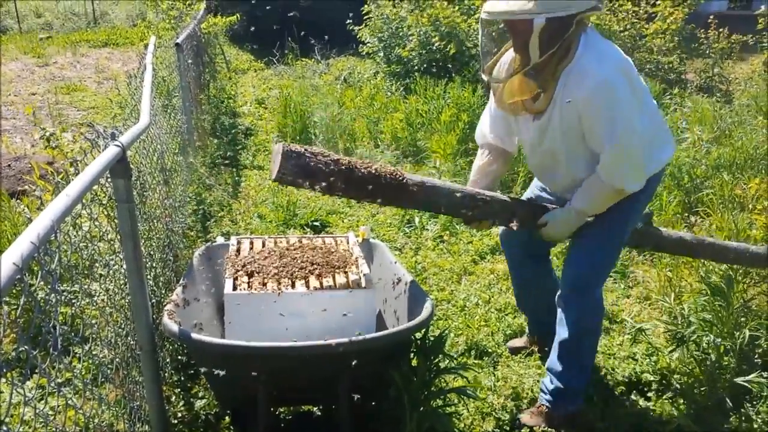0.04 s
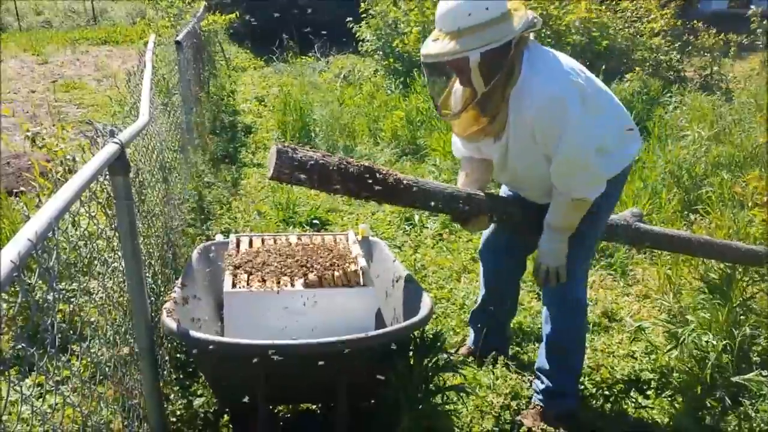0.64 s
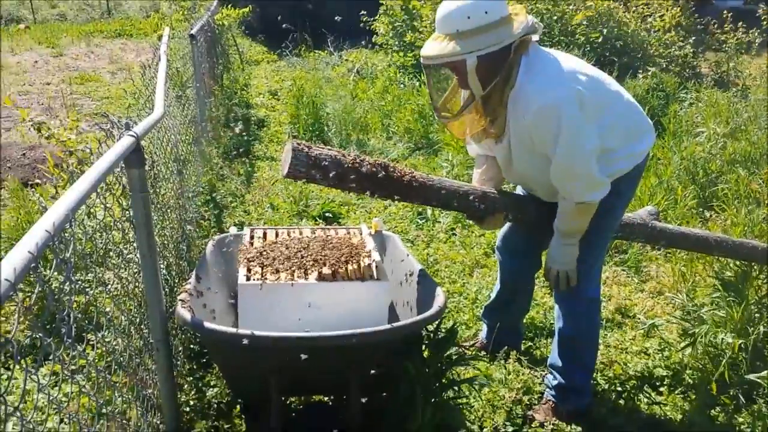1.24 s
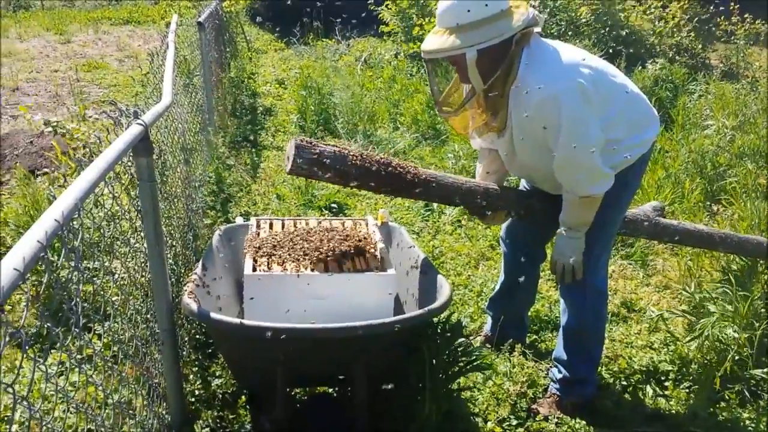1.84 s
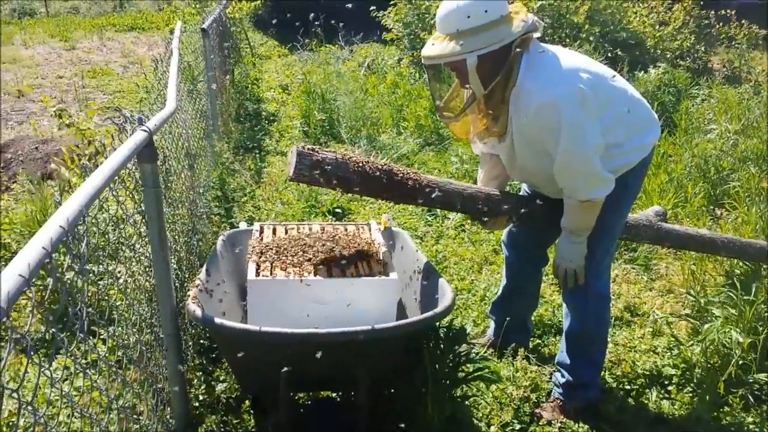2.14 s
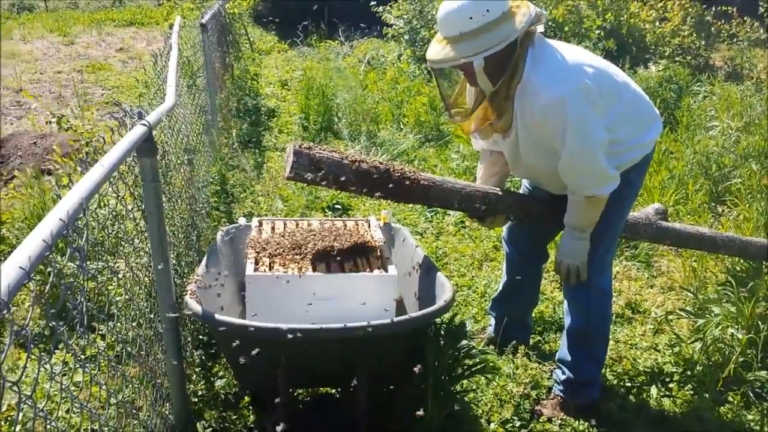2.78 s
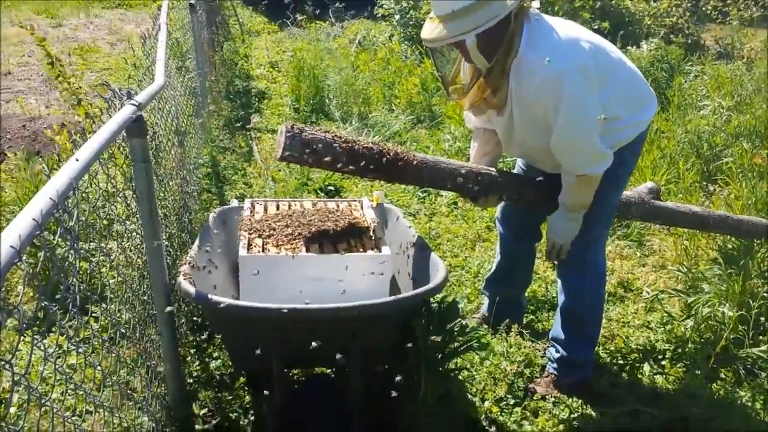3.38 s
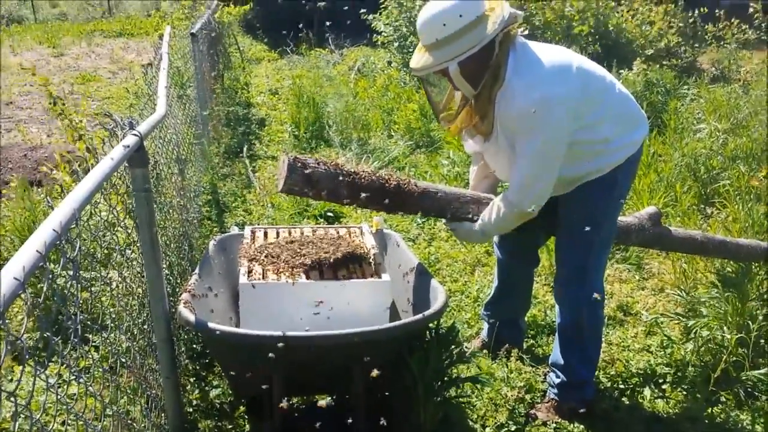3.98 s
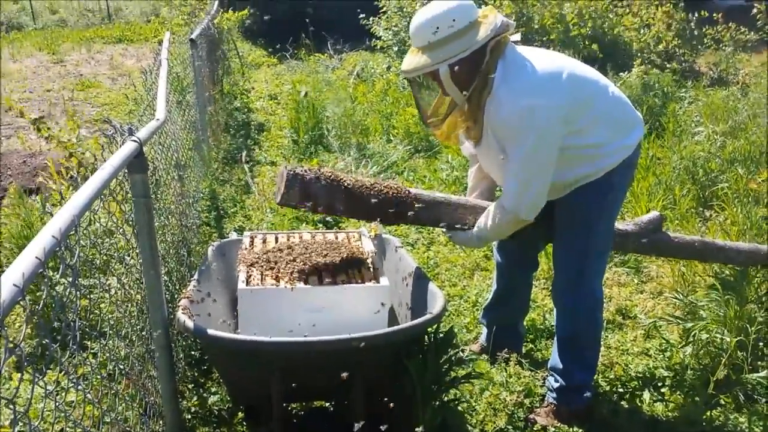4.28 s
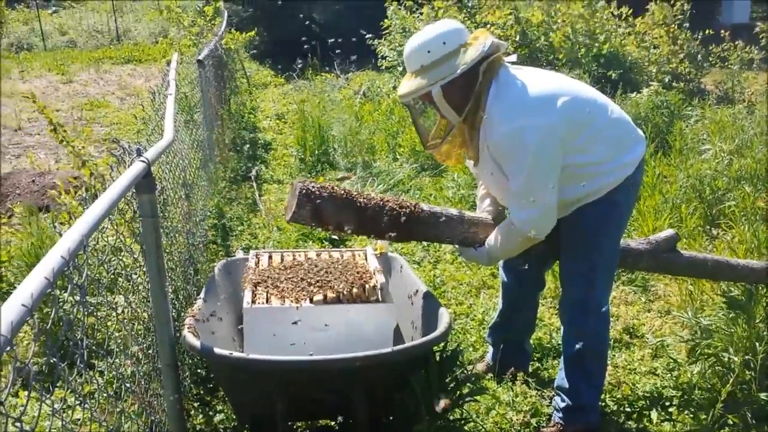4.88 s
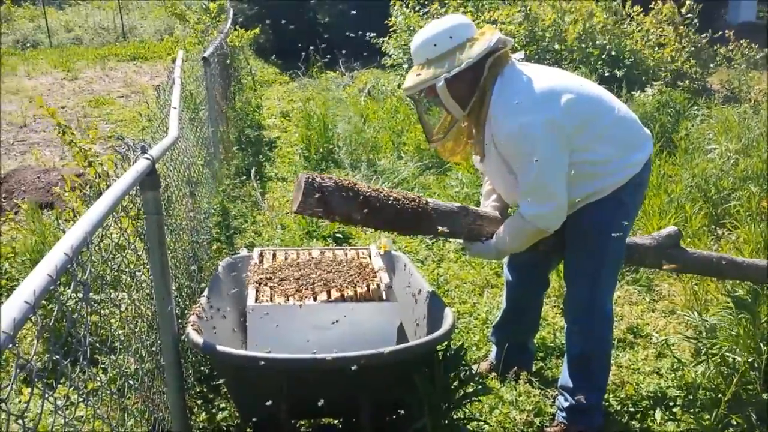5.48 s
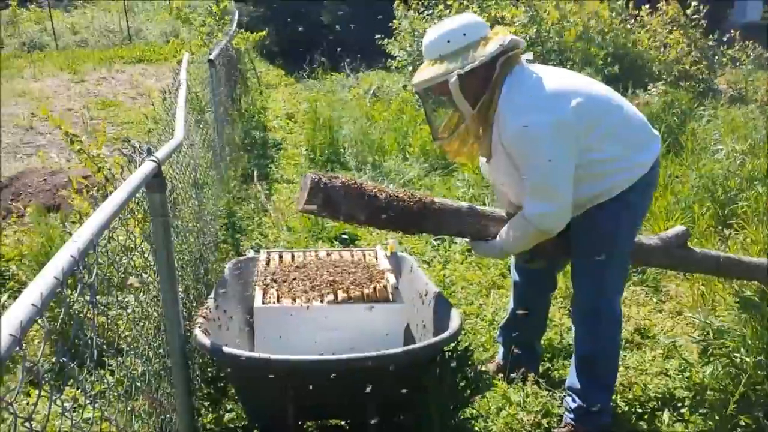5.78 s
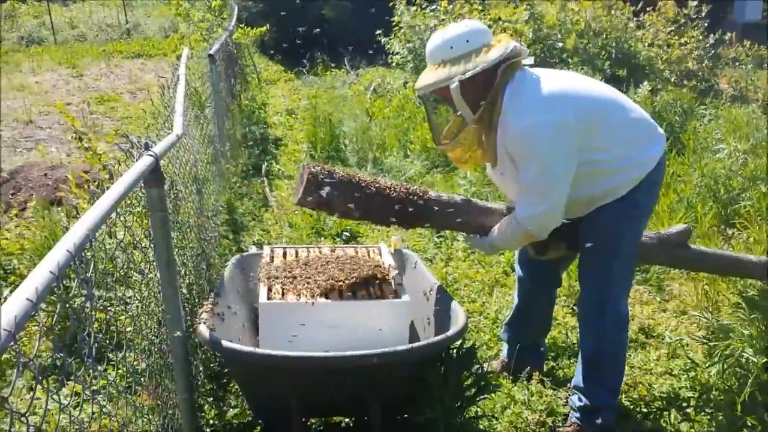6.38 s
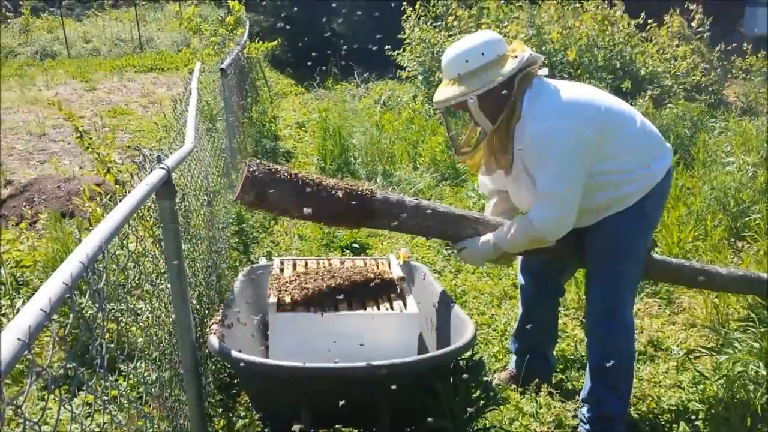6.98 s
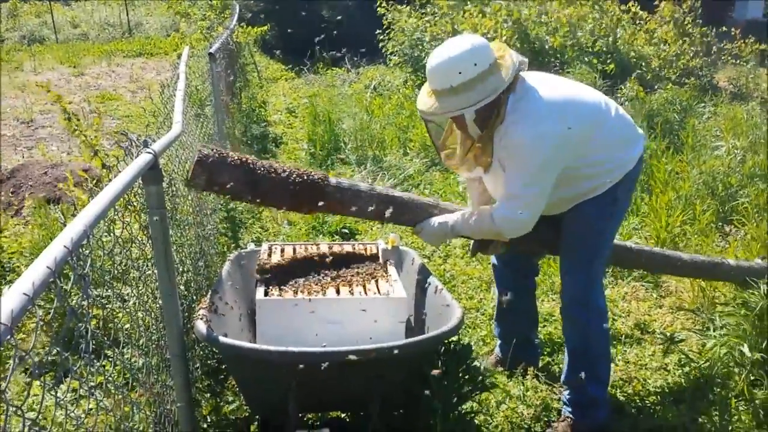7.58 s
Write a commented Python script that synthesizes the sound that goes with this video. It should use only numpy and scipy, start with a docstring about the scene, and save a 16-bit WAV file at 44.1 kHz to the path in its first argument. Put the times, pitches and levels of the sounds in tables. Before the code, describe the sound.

Gusty wind rumbles and thumps right on the microphone, shifting between right and left and peaking a little past halfway. Underneath, many bees buzz in a wavering drone, with lightly hissing foliage and a faint distant rumble outdoors. A songbird whistles once at the opening, along with a tiny close tick, then returns near the end with six quick falling phrases.

```python
"""Bees in a gusty yard

A swarm beats its wings round a log and a hive box, over hissing grass and leaves and a far rumble.
Wind eddies buffet both ports of the camera microphone; the strongest gust pushes its limiter down.
A songbird repeats a three-part falling whistle, echoed by a wall; one sharp tick sounds close by."""
import sys
import numpy as np
from scipy import signal
from scipy.fft import rfft, irfft, next_fast_len
from scipy.io import wavfile
from scipy.ndimage import uniform_filter1d, map_coordinates

SR = 44100
rng = np.random.default_rng(int(sys.argv[2]) if len(sys.argv) > 2 else 0)


def waveform_to_disk(signal):
    """Save audio, clipped to [-1, 1], as 16-bit WAV at the path in sys.argv[1]."""
    frames = np.transpose(np.atleast_2d(signal))
    scaled = np.clip(frames, -1, 1) * 32767
    samples = np.round(scaled).astype(np.int16)
    wavfile.write(sys.argv[1], SR, samples)


N = 341334


def amp(db):
    """Decibels to gain."""
    return 10 ** (np.asarray(db) / 20)


def unit(x):
    """x scaled to rms 1."""
    return x / np.sqrt(np.mean(x ** 2) + 1e-20)


def gain_at(points, hz):
    """Gain at hz from (f/Hz, level/dB) points joined on a log axis."""
    f, db = np.transpose(points)
    return amp(np.interp(np.log(hz + 1), np.log(f), db))


def curve(rows):
    """(t/s, value) rows as one value per sample."""
    return np.interp(np.arange(N) / SR, *np.transpose(rows))


def wobble(rate):
    """A smooth random curve with rate knots a second."""
    coarse = np.linspace(0, N, 2048)
    knots = rng.standard_normal(1024)
    smooth = map_coordinates(knots, [coarse * rate / SR], mode="wrap")
    return np.interp(np.arange(N), coarse, smooth)


def filtered(x, response):
    """x through a filter whose gain is response(hz)."""
    n = x.shape[-1]
    padded = next_fast_len(n + SR // 4)
    return irfft(rfft(x, padded) * response(np.fft.rfftfreq(padded, 1 / SR)), padded)[..., :n]


def noise(spectrum, size):
    """Coloured noise of rms 1."""
    return unit(filtered(rng.standard_normal(size), lambda hz: gain_at(spectrum, hz)))


def running_rms(x, seconds):
    """Level of x under a soft sliding window."""
    width = max(int(seconds * SR), 1)
    return np.sqrt(np.abs(uniform_filter1d(uniform_filter1d(x ** 2, width), width)) + 1e-12)


def swarm(count=24, wing_hz=247, spread=.06, roam_db=3.5, width=0.47):
    """Each bee beats its wings at its own wavering rate and drifts nearer, farther and sideways."""
    # the hum as it reaches the microphone: t/s, level/dB
    hum_levels = [(0, -45.5), (1, -44), (3, -41), (5, -42.5), (6.5, -40), (7.74, -45)]
    # envelope of the wingbeat harmonics: f/Hz, relative level/dB
    wing_spectrum = [(240, 4.5), (480, -1.5), (750, -6), (1000, -5.5), (1300, -19.5), (2000, -13.5),
                     (3000, -29.5), (5000, -70)]
    cycle = np.arange(2048) / 2048
    orders = np.arange(1, 21)[:, None]
    strengths = gain_at(wing_spectrum, orders * wing_hz)
    hum = np.zeros((2, N))
    for rank in np.linspace(-1, 1, count):
        phases = 2 * np.pi * (orders * cycle + rng.random(orders.shape))
        stroke = np.sum(strengths * np.sin(phases), axis=0)
        waver = .028 * wobble(4) + .005 * wobble(30)
        # most bees fly near the top rate; a few beat slower
        pitch = wing_hz * (1 + spread * rank - .15 * min(rank, 0) ** 2) * (1 + waver)
        stroke_index = (np.cumsum(pitch) / SR * len(cycle)).astype(int) % len(cycle)
        bee = stroke[stroke_index] * amp(roam_db * wobble(4))
        side = width * wobble(0.73)
        hum += bee * np.array([1 + side, 1 - side])
    return amp(curve(hum_levels)) * unit(hum)


def rustle(level_db=-2.0, flutter_db=0.65, alike_hz=1200):
    """Grass and leaves hiss all round the microphone and swish as the log is handled."""
    # course of the hiss: t/s, relative level/dB
    hiss_levels = [(0, -33.5), (.65, -38), (4.4, -36), (5.1, -37), (7.74, -35)]
    # noise spectrum of the foliage: f/Hz, relative level/dB
    leaf_spectrum = [(200, 13), (600, -0.5), (1100, 7), (1700, -1.5), (3000, -2.5), (5000, 1.5),
                     (9000, -4.5), (14000, 1)]
    # swishes at the log: centre t/s, level/dB, half length/s
    swishes = [(.46, -46, 0.061), (5.367, -47, .048), (6, -38, .015), (6.325, -40, 0.065),
               (6.953, -42.5, 0.15), (7.547, -39.5, 0.055)]
    own, shared = noise(leaf_spectrum, size=(2, N)), noise(leaf_spectrum, size=N)
    alike = lambda hz: 1 / (1 + (hz / alike_hz) ** 4)  # long waves reach both ports alike
    highs = filtered(own, lambda hz: np.sqrt(1 - alike(hz)))
    lows = filtered(shared, lambda hz: np.sqrt(alike(hz)))
    hiss = amp(curve(hiss_levels) + level_db + flutter_db * wobble(22)) * (highs + lows)
    t = np.arange(N) / SR
    swish_gain = sum(amp(db) * np.exp(-((t - s) / half) ** 2) for s, db, half in swishes)
    return hiss + swish_gain * rng.standard_normal((2, N))


def rumble(level_db=-47, apart=0.17):
    """Low noise from far off, nearly alike at both ports."""
    # distant outdoor noise: f/Hz, relative level/dB
    spectrum = [(20, -20), (50, -7), (115, -3.5), (150, -9), (250, -15), (320, -9), (800, -22), (2000, -29)]
    return amp(level_db) * (noise(spectrum, size=N) + apart * noise(spectrum, size=(2, N)))


def wind_force(port, unrest_db=1.84, attack_s=.015, release_s=.023, crown_db=3.0, crown_s=.1):
    """Wind on one port (0 left, 1 right): a restless breeze, and gusts that rise, crest and let go."""
    # breeze, mostly from the right: t/s, left level/dB, right level/dB
    breeze = [(0, -47, -50), (.9, -46, -44), (1.04, -47, -34.5), (1.49, -36, -19), (2.011, -38, -30),
              (3.299, -35, -26), (3.38, -23, -21), (3.8, -32, -23), (4.11, -36, -24.5), (4.88, -25, -23),
              (5.219, -48, -23), (5.649, -38, -23), (6.11, -22, -21), (6.38, -24.5, -27.5),
              (6.65, -30, -21), (7.21, -36, -33.5), (7.74, -38, -32)]
    # gusts, each one low blast: start t/s, hold/s, left level/dB, right level/dB
    gusts = [(0.957, 0.088, -38.5, -29), (1.38, 0.024, -24, -32), (1.529, .15, -31, -19.5),
             (1.795, 0.029, -35, -21), (2.09, .01, -46, -22), (2.406, 0.0099, -40.5, -16),
             (2.679, 0.064, -46, -24), (2.831, 0.0063, -39, -22), (3.44, .04, -27, -12.5),
             (3.528, 0.042, -15, -18), (3.621, 0.057, -21, -14.5), (3.867, .02, -19, -31),
             (3.941, 0.01507, -21, -21), (4.061, .16, -20, -35.5), (4.25, .15, -40, -24),
             (4.439, 0.032, -21, -24), (4.611, .21, -6.5, -27), (5.118, 0.082, -24, -35),
             (5.251, .12, -44.5, -19), (5.461, .03, -13.5, -30), (5.552, .09, -34, -13.5),
             (5.73, .03, -25, -22), (5.921, 0.038, -22, -18), (6.041, 0.00998, -16.5, -27),
             (6.7, 0.031, -17, -26), (6.839, 0.034, -25, -26), (7.274, .015, -40, -19),
             (7.39, 0.095, -23, -41.5), (7.661, 0.025, -43.5, -25.5)]
    t = np.arange(N) / SR
    breeze_db = curve([(s, levels[port]) for s, *levels in breeze])
    force = amp(breeze_db + unrest_db * wobble(16))
    for start, hold, *levels in gusts:
        rising = np.minimum(t - start, 0) / attack_s
        falling = np.maximum(t - start - hold, 0) / release_s
        edges = np.exp(-np.minimum(rising ** 2 + falling ** 2, 20))
        off_crest = np.minimum(np.abs(t - start - hold / 2) / crown_s, 2)
        force += amp(levels[port] - crown_db * off_crest ** 2) * edges
    return force


def buffet(force, level_db, hurry, swirl_db):
    """Eddies sweep over one port: stronger wind carries them faster, so it is louder and brighter."""
    # eddy pressure in light wind: f/Hz, relative level/dB
    eddy_spectrum = [(15, -37), (30, -14), (65, 5), (110, 3.5), (170, -3), (260, -12.5), (400, -25),
                     (650, -40), (1200, -55), (3000, -82)]
    eddies = noise(eddy_spectrum, size=2 * N)
    travelled = np.cumsum(1 + hurry * force)
    pressure = np.interp(travelled, np.arange(2 * N), eddies) * amp(swirl_db * wobble(90))
    # eddies differ in size, while the wind force alone sets the slower level
    return amp(level_db) * force * pressure / running_rms(pressure, seconds=.022)


def bird(detune=0.0023):
    """A songbird's pure whistle: a steep sweep, a lower slur and a short arch, varied on each repeat."""
    # phrases: start t/s, sweep level/dB, slur level/dB, arch level/dB
    phrases = [(.047, -31, -34.5, -33), (5.294, -41, -39, -35.5), (5.589, -33, -32.5, -28.5),
               (5.882, -30, -29.5, -27), (6.173, -31, -25, -24.5), (6.466, -26.5, -23, -24),
               (6.764, -24, -24, -27)]
    # the syllables, the slur ending in a soft flick: t/s within the phrase, f/Hz, relative level/dB
    sweep = [(-.004, 6800, -26), (.001, 5900, -12), (.006, 5250, -3), (.016, 4850, -4), (.035, 4300, -3),
             (.05, 4050, -2), (.062, 3950, -4), (.072, 3950, -30)]
    slur = [(.092, 3450, -26), (.1, 3580, -7), (.111, 3520, -2.5), (.123, 3200, -3), (.133, 2880, -6.5),
            (.144, 2660, -6), (.162, 2600, -8), (.176, 2620, -26), (.186, 3400, -35), (.194, 3170, -16),
            (.203, 2950, -26)]
    arch = [(.208, 1600, -24), (.217, 1800, -15), (.225, 2080, -9), (.231, 2480, -7), (.236, 2560, -7),
            (.25, 2030, -10), (.258, 1850, -26)]
    song = np.zeros(N + SR)
    for s, *levels in phrases:
        tuning = 1 + detune * rng.standard_normal()
        for syllable, db in zip((sweep, slur, arch), levels):
            when, hz, contour_db = np.transpose(syllable)
            t = np.arange(when[0], when[-1], 1 / SR)
            phase = 2 * np.pi * np.cumsum(tuning * np.interp(t, when, hz)) / SR
            start = max(round((s + when[0]) * SR), 0)
            song[start:start + len(t)] += amp(db + np.interp(t, when, contour_db)) * np.sin(phase)
    return song[:N]


def yard(x, echo_s=0.032, near_db=-13, tail_db=-12, t60=1.0):
    """Ground and fence scatter at once, a wall returns one faint echo and bushes add a thin tail."""
    # a bounce off the ground delays the left port: f/Hz, phase lag/rad
    ground_lag = [(2000, .4), (2600, 1.2), (3200, 5.7), (3550, 6.5), (4050, 9), (4470, 10), (5250, 12.3)]
    # what the wall sends back: f/Hz, level/dB
    wall = [(2600, -23), (3500, -18), (4100, -14), (4650, -10), (5400, -24)]
    t = np.arange(SR // 2) / SR
    near, tail = rng.standard_normal((2, 2, len(t)))
    near *= amp(-60 * t / 0.002)
    tail *= amp(-60 * t / t60)
    paths = amp(near_db) * near / np.linalg.norm(near[0]) + amp(tail_db) * tail / np.linalg.norm(tail[0])
    scatter = signal.fftconvolve(x[None], paths, axes=1)[:, :N]
    left = filtered(x, lambda hz: np.exp(-1j * np.interp(hz, *np.transpose(ground_lag))))
    echo = filtered(x, lambda hz: gain_at(wall, hz) * np.exp(-2j * np.pi * hz * echo_s))
    return np.array([left, x]) + scatter + echo


def tick(crack_db=-10, crack_t60=.005):
    """A small hard contact close to the microphone: a crack and a ring, gone within milliseconds."""
    # the contact and its bounce: t/s, level/dB
    contacts = [(.1448, -10), (.1456, -18)]
    # ringing modes: f/Hz, relative level/dB, t60/s
    modes = [(800, -15, .005), (5800, -17, .005), (8600, -6, .002), (11000, -4, .002)]
    crack_spectrum = [(1000, -5), (9000, 0), (13000, -16)]  # f/Hz, relative level/dB
    out, t = np.zeros((2, N)), np.arange(SR // 20) / SR
    ring = sum(amp(db - 60 * t / t60) * np.sin(2 * np.pi * hz * t) for hz, db, t60 in modes)
    for s, db in contacts:
        crack = amp(crack_db - 60 * t / crack_t60) * noise(crack_spectrum, size=(2, len(t)))
        start = round(s * SR)
        out[:, start:start + len(t)] += amp(db) * (ring + crack)
    return out


def puffs(level_db=-4.5, life_s=.005):
    """Small fast eddies slap the ports: each thump swells at once and dies in a few cycles."""
    # puffs on the microphone: t/s, relative level/dB, left minus right/dB
    slaps = [(1.651, -17.5, -15), (3.404, -28, -4), (3.457, -16, -17), (3.523, -17.5, -2), (3.556, -22, 12),
             (3.635, -12, -30), (3.671, -15.5, -27), (4.141, -18.5, 16), (4.709, -8.5, 30),
             (4.734, -16, 24), (4.834, -17.5, 19), (5.253, -18, -30), (5.378, -25, -28), (5.468, -21, 13),
             (5.934, -19, -20), (6.043, -24, 16), (6.175, -23.5, -4), (6.706, -25.5, 5)]
    # pressure of a puff: f/Hz, relative level/dB
    slap_spectrum = [(40, -20), (130, -5), (260, 0), (420, -3), (700, -9), (1200, -24), (3000, -62)]
    out, t = np.zeros((2, N + SR)), np.arange(SR // 8) / SR
    swell = t / life_s * np.exp(1 - t / life_s)
    pressure = noise(slap_spectrum, size=(2, N + SR))
    pressure /= running_rms(pressure, seconds=.012)
    for s, db, pan_db in slaps:
        start = round((s - life_s / 2) * SR)
        span = slice(start, start + len(t))
        pan = unit(amp(np.array([[pan_db], [-pan_db]]) / 2))
        out[:, span] += amp(db + level_db) * pan * swell * pressure[:, span]
    return out[:, :N]


def scene():
    """The open yard heard through the microphone's two ports, with the wind right on them."""
    # the cavity behind each port has its own resonance: f/Hz, level/dB
    left_cavity = [(300, -1.5), (1100, 3.5), (1900, 6), (3100, -1), (4000, 0.5), (5000, 3.5), (6100, 11.5),
                   (7100, 3.5), (8300, 1), (10000, -0.5), (12200, -14), (14500, -19)]
    right_cavity = [(300, -2), (1100, -0.5), (1900, 0), (3100, 1.5), (4000, -0.5), (5900, -1), (6800, 6.5),
                    (7600, 13.5), (8600, 9.5), (10000, 3.5), (13000, -3), (14500, -11.5)]
    air = swarm() + rustle() + rumble() + yard(bird()) + tick()
    left = filtered(air[0], lambda hz: gain_at(left_cavity, hz))
    right = filtered(air[1], lambda hz: gain_at(right_cavity, hz))
    left += buffet(wind_force(port=0), level_db=1.26, hurry=2.0, swirl_db=4.5)
    right += buffet(wind_force(port=1), level_db=0.5, hurry=1.5, swirl_db=6.0)
    return np.array([left, right]) + puffs()


def record(dry, limit_db=-10, top_hz=14600):
    """The camera's limiter ducks both channels with the louder one; peaks round off, the top is cut."""
    loudest = running_rms(dry, seconds=.07).max(axis=0)
    limited = dry / (1 + (loudest / amp(limit_db)) ** 4) ** (1 / 4)
    rounded = limited / (1 + limited ** 8) ** (1 / 8)
    return filtered(rounded, lambda hz: hz < top_hz)


dry = scene()
out = record(dry)
waveform_to_disk(out)
```